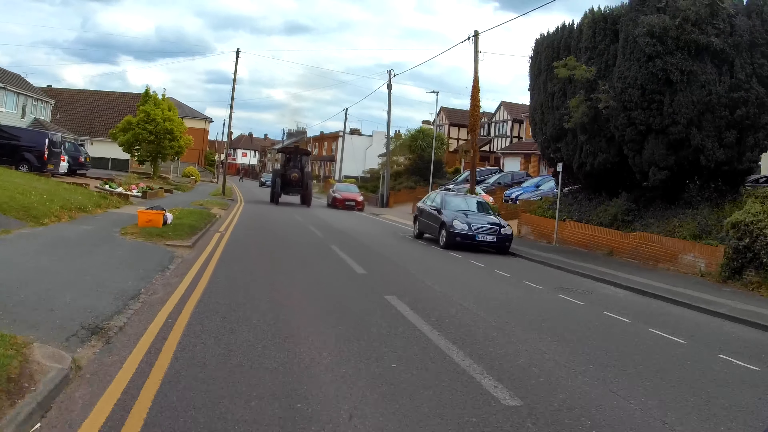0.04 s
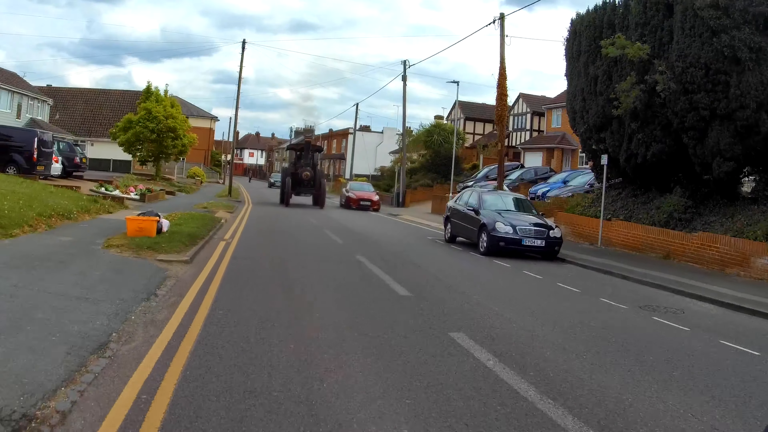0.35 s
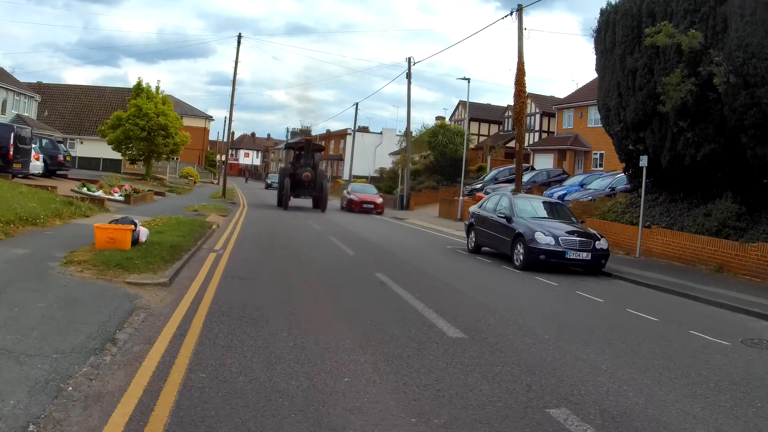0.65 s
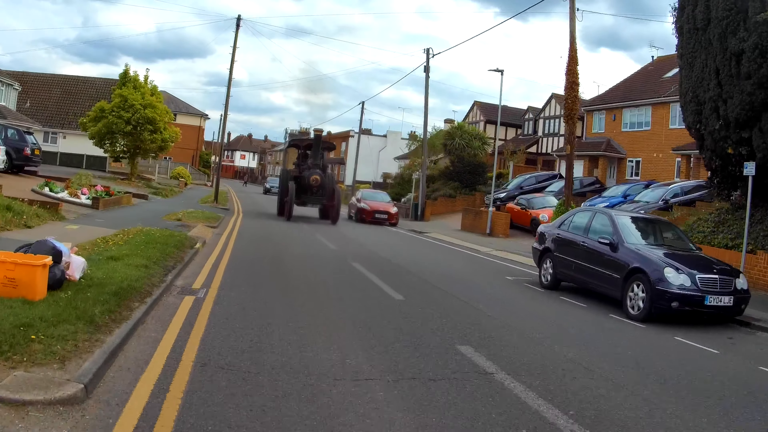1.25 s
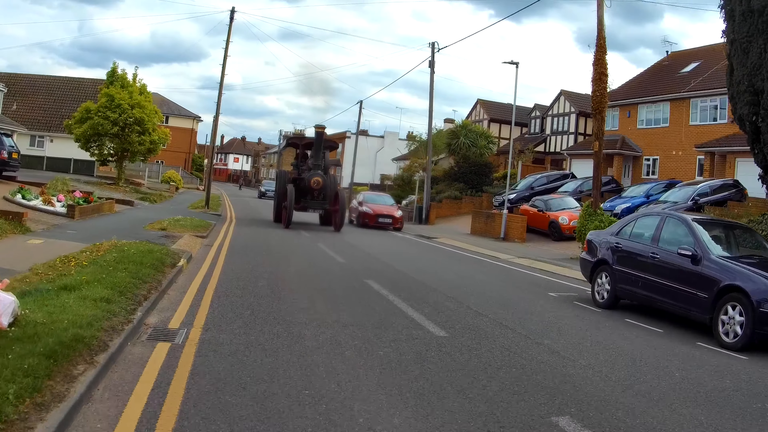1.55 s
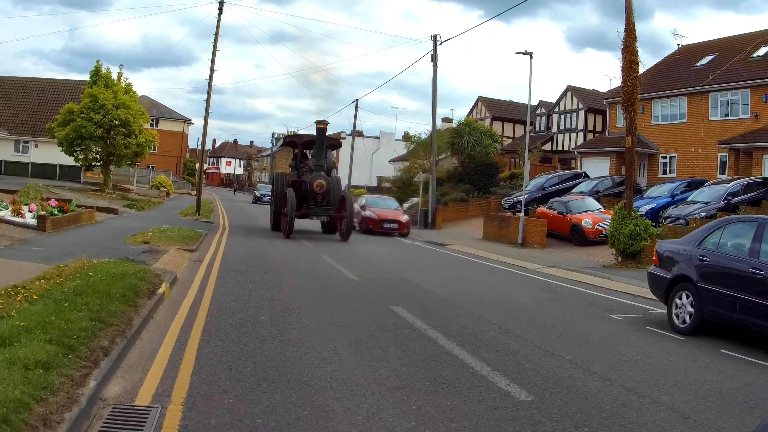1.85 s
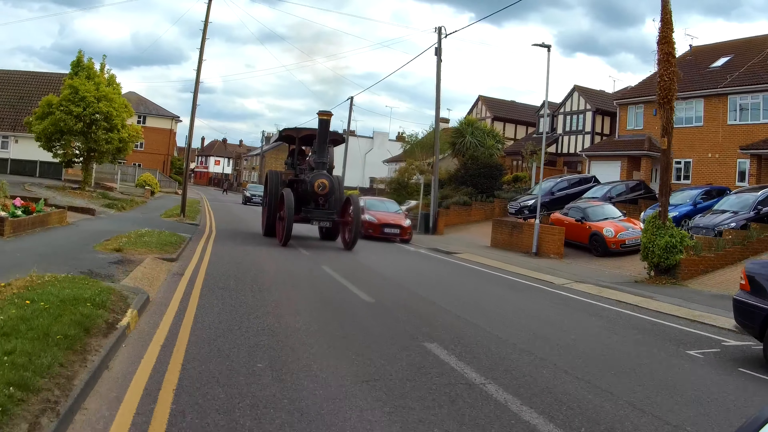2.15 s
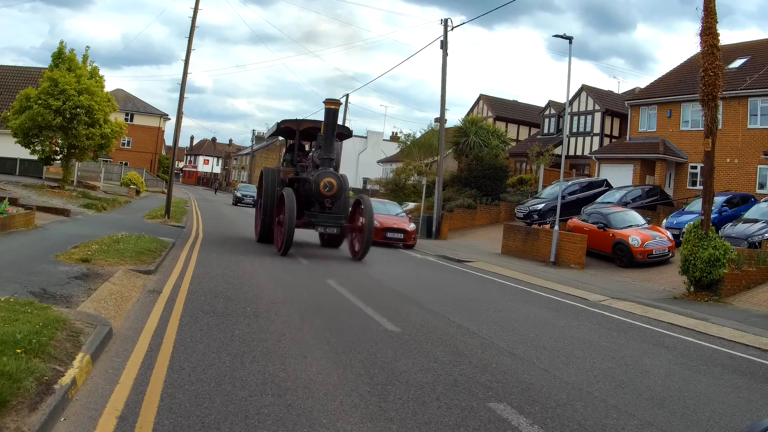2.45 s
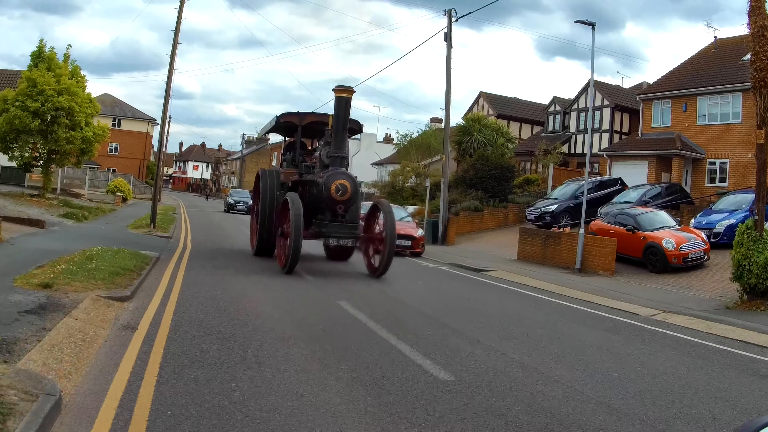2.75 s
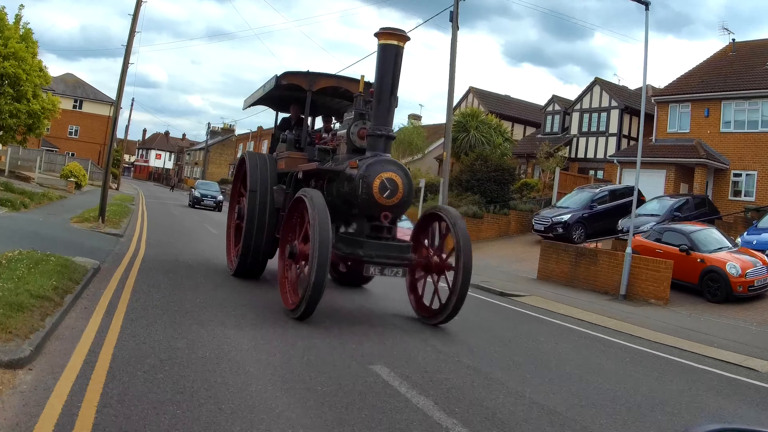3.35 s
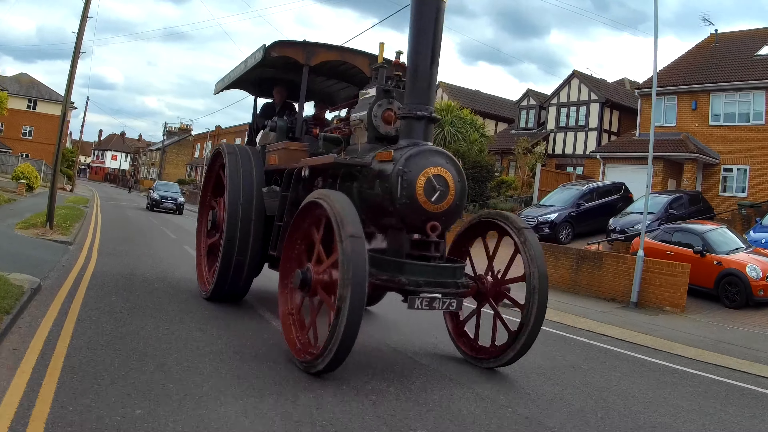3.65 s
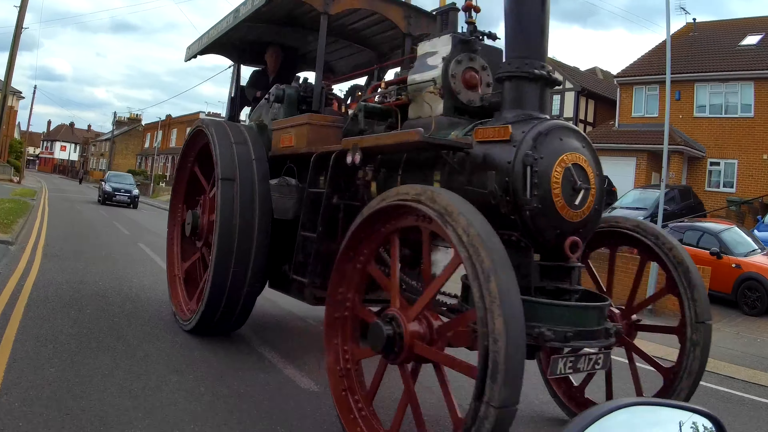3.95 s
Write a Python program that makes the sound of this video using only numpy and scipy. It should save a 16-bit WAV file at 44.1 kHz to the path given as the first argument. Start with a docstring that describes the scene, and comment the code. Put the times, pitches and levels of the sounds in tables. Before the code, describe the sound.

An approaching steam traction engine chuffs and clanks, growing louder over throbbing tyre noise.

```python
"""A steam traction engine comes up a street, growing louder and chuffing about 3.5 times a second.
Each chuff is a turbulent jet of steam that excites resonances in the chimney and pipes. Impacts and
friction make its ironwork clatter, ring and squeak, grit cracks under its tyres, and house fronts echo.
It is heard from a camera on a small moving vehicle, whose ride adds tyre noise, a quick wheel throb,
a few bumps in the road and the rumble of a shaking mount."""
import sys
import numpy as np
from scipy import signal
from scipy.fft import rfft, irfft
from scipy.io import wavfile
from scipy.ndimage import uniform_filter1d, minimum_filter1d

SR = 44100
rng = np.random.default_rng(int(sys.argv[2]) if len(sys.argv) > 2 else 0)


def waveform_to_disk(signal):
    """Save audio, clipped to [-1, 1], as 16-bit WAV at the path in sys.argv[1]."""
    frames = np.transpose(np.atleast_2d(signal))
    scaled = np.clip(frames, -1, 1) * 32767
    samples = np.round(scaled).astype(np.int16)
    wavfile.write(sys.argv[1], SR, samples)


N = 176400
T = np.arange(N) / SR


def amp(db):
    """Logarithmic level: 20 dB is a factor of ten in amplitude."""
    return 10 ** (np.asarray(db) / 20)


def unit(x):
    """Normalisation to rms 1."""
    return x / np.sqrt(np.mean(x ** 2) + 1e-20)


def curve(points):
    """Linear interpolation between (time [s], value) points."""
    return np.interp(T, *np.transpose(points))


def shaped(x, points):
    """Spectral filtering by a curve of (frequency [Hz], gain [dB])."""
    hz, db = np.transpose(points)
    log_hz = np.log(np.fft.rfftfreq(2 * N, 1 / SR) + 1)
    gain = amp(np.interp(log_hz, np.log(hz + 1), db))
    return irfft(rfft(x, 2 * N) * gain)[:N]


def colour(x, points):
    """Spectral shaping at rms 1."""
    return unit(shaped(x, points))


def ring(hz, half_width_hz):
    """Resonance under random forcing, at rms 1; centred on 0 Hz it is a random fluctuation."""
    f = np.fft.rfftfreq(N, 1 / SR)
    return unit(irfft(rfft(rng.standard_normal(N)) / (1 + ((f - hz) / half_width_hz) ** 2), N))


def steadied(x, size):
    """Division by the running rms evens out the swells of a noise."""
    return x / np.sqrt(uniform_filter1d(uniform_filter1d(x ** 2, size), size) + 1e-9)


def sine(hz):
    """Frequency modulation: phase is the integral of frequency."""
    return np.sin(2 * np.pi * np.cumsum(hz) / SR)


def impulses(per_s):
    """A Poisson process: independent events at a mean rate."""
    return rng.random(N) < per_s / SR


# exhaust beats (time [s], duration [s], level [dB], chimney bark relative to the beat [dB])
EXHAUST_BEATS = [(-.02, 0.21, -41.5, -5), (0.3, 0.14, -37.5, -6), (0.578, 0.077, -33, -15),
                 (0.84, 0.23, -43, 0), (1.09, 0.15, -39, -10), (1.429, 0.061, -36.5, 0),
                 (1.705, .18, -35, -1.5), (1.995, 0.077, -35, 0), (2.232, 0.15, -32, -3.5),
                 (2.618, 0.14, -34, 2), (2.845, 0.099, -32.5, 0), (3.127, 0.12, -29.5, -1),
                 (3.408, 0.12, -28, -23), (3.586, 0.11, -28.5, -1), (3.678, 0.19, -30, -3),
                 (3.864, 0.072, -25, -13)]
# spectra of the steam jet and the chimney's hollow bark (frequency [Hz], relative level [dB])
STEAM_SPECTRUM = [(60, -18), (150, 5.5), (400, 0.5), (800, 2.5), (1400, 0.5), (2000, 0), (3000, -11),
                  (3900, -14.5), (4400, -18.5), (6000, -28.5), (6600, -30), (7200, -30), (9000, -41.5),
                  (15000, -63)]
BARK_SPECTRUM = [(300, -32), (600, -10), (800, -1), (1100, 0.5), (1450, -7), (2500, -27), (8000, -72)]
# steam pipe resonances (frequency [Hz], half-width [Hz], level relative to the jet [dB])
PIPE_MODES = [(4660, 58, -31.5), (5450, 47, -32), (6170, 85, -29.5), (7160, 57, -34)]


def exhaust(rise_s=0.014, fall_s=0.025):
    """Jet noise: each puff of steam rises, holds and decays, exciting the chimney and pipes."""
    jet_level, bark_level = np.zeros(N), np.zeros(N)
    for start, length, db, bark_db in EXHAUST_BEATS:
        rise = np.clip((T - start) / rise_s, 0, 1)
        decay = np.exp(-np.maximum(T - start - length + fall_s, 0) / fall_s)
        puff = amp(db) * rise * decay
        jet_level += puff
        bark_level += amp(bark_db) * puff
    spits = unit(rng.choice([-1, 1], N) * impulses(per_s=780))
    flutter = amp(2.8 * ring(0, half_width_hz=25))
    steam = colour(rng.standard_normal(N) + amp(-4) * spits, STEAM_SPECTRUM)
    pipes = sum(amp(db) * ring(hz, width) for hz, width, db in PIPE_MODES)
    bark = colour(rng.standard_normal(N), BARK_SPECTRUM)
    return jet_level * flutter * (steam + pipes) + bark_level * bark


# growth of clatter, jangle and grit as the engine nears (time [s], level [dB])
APPROACH_LEVEL = [(0, -47.5), (1, -41.5), (2, -38), (2.6, -33.5), (3.1, -32), (3.4, -28.5), (3.55, -27),
                  (3.75, -25), (4, -23.5)]
# spectrum of the running gear (frequency [Hz], relative level [dB])
CLATTER_SPECTRUM = [(60, -15), (110, 12), (200, 3), (400, 3.5), (520, -3.5), (1000, -1), (1500, -2.5),
                    (2000, -9.5), (3000, -19), (3900, -19), (4400, -25.5), (7300, -40.5), (9000, -55),
                    (15000, -62)]


def running_gear(spread_db=4.5, knock_share=0.13):
    """Impact and friction noise: many small iron knocks add in power to the grinding of the wheels."""
    knocks = impulses(per_s=320) * rng.choice([-1, 1], N)
    force = amp(spread_db * np.minimum(rng.exponential(1, N), 4))
    grinding = rng.standard_normal(N)
    drive = np.sqrt(knock_share) * unit(knocks * force) + np.sqrt(1 - knock_share) * grinding
    return amp(curve(APPROACH_LEVEL)) * colour(drive, CLATTER_SPECTRUM)


# gear wheel resonances (frequency [Hz], half-width [Hz], relative level [dB])
GEAR_MODES = [(786, 31, -50), (1900, 27, -46.5), (2320, 37, -53), (2432, 34, -53), (3524, 19, -65),
              (5600, 76, -67.5), (7240, 44, -79)]
# growth of the ringing and whine (time [s], gain [dB])
GEAR_GAIN = [(0, -3.5), (.5, -4), (1.2, -2.5), (2.2, 2.5), (3.2, 4.5), (3.65, 4.5), (4, 6.5)]
# swells of the whine (peak time [s], duration [s], level [dB])
SQUEALS = [(0.449, 0.038, -37), (0.734, 0.23, -40.5), (1.132, .06, -38), (1.256, 0.04, -38),
           (1.364, 0.035, -34), (1.57, 0.24, -44.5), (2.545, 0.018, -27), (2.664, 0.11, -43),
           (2.892, 0.034, -29), (3.083, 0.018, -27), (3.395, 0.085, -34), (3.618, 0.17, -32),
           (3.694, 0.014, -24), (3.896, 0.033, -18)]


def gear_ring(whine_hz=1894, wander_hz=8.96, roughness=0.6):
    """Forced vibration: rubbing keeps the gears ringing; their wavering whine swells into squeals."""
    gain = amp(curve(GEAR_GAIN))
    modes = sum(amp(db) * steadied(ring(hz, width), size=6000) for hz, width, db in GEAR_MODES)
    squeals = sum(amp(db) / (1 + (2 * (T - peak) / length) ** 4) for peak, length, db in SQUEALS)
    pitch = whine_hz + wander_hz * ring(0, 9.76)
    whine = np.sqrt(2) * sine(pitch) + roughness * ring(whine_hz, 45)
    return gain * modes + (amp(-41) * gain + squeals) * whine


# modes of loose iron plates and rods (frequency [Hz], relative level [dB], 60 dB decay time [s])
PLATE_MODES = [(292.4, -4.5, 0.093), (407, -5, 0.22), (804.4, -5, 0.36), (908, -3.5, 0.081),
               (1003, -3, 0.15), (1185, -9, 0.1), (1385, -4.5, 0.028), (1708, -12, 0.12)]


def jangle(attack_s=0.002):
    """Free vibration: each loose part, struck at random, rings down at its natural frequency."""
    t, out = T[:SR // 3], np.zeros(N)
    for hz, db, t60 in PLATE_MODES:
        knocks = impulses(per_s=14) * rng.uniform(0.57, 1, N)
        tone = (1 - np.exp(-t / attack_s)) * amp(-60 * t / t60) * np.sin(2 * np.pi * hz * t)
        out += amp(db) * unit(signal.oaconvolve(knocks, tone)[:N])
    return amp(curve(APPROACH_LEVEL) - 7.5) * out


# ironwork impacts (time [s], frequency [Hz], half-width [Hz], level [dB], 60 dB decay time [s])
IRON_IMPACTS = [(1.105, 2580, 190, -24.5, 0.082), (1.435, 3660, 110, -41.5, 0.16),
                (3.168, 2330, 260, -28, .11), (3.508, 2330, 39.7, -29.5, .15),
                (3.89, 2680, 900, -29.5, .13)]


def clanks(rise_s=0.005):
    """Damped resonance: loose iron parts knock and ring briefly in a band of noise."""
    out = np.zeros(N)
    for start, hz, width, db, t60 in IRON_IMPACTS:
        t = np.maximum(T - start, 0)
        envelope = np.minimum(t / rise_s, 1) * amp(db - 60 * t / t60)
        out += envelope * steadied(ring(hz, width), size=500)
    return out


# joint squeaks (time [s], duration [s], first frequency [Hz], last frequency [Hz], level [dB])
JOINT_SQUEAKS = [(0.319, 0.041, 2383, 2490, -36), (0.599, 0.044, 2340, 2530, -37.5),
                 (1.735, 0.076, 2320, 2436, -33.5), (2.306, 0.026, 2320, 2330, -33.5),
                 (3.168, .036, 2280, 2485, -27.5)]


def squeaks(waver_hz=21.3, roughness=0.35):
    """Friction tones: dry joints give short, slightly rough upward glides."""
    out, waver = np.zeros(N), waver_hz * ring(0, 66)
    for start, length, first_hz, last_hz, db in JOINT_SQUEAKS:
        progress = np.clip((T - start) / length, 0, 1)
        pitch = first_hz + (last_hz - first_hz) * progress + waver
        out += amp(db) * np.sqrt(2 * abs(np.sin(np.pi * progress))) * sine(pitch)
    return out * (1 + roughness * ring(0, 92))


# larger stones being crushed (peak time [s], half-duration [s], level [dB])
CRUSHED_STONES = [(1.125, 0.017, -55), (2.707, .016, -51), (2.89, .018, -51), (3.178, .015, -48),
                  (3.283, .015, -49), (3.605, 0.0045, -39), (3.901, .016, -53)]
# spectra of cracking grit and stones (frequency [Hz], relative level [dB])
GRIT_SPECTRUM = [(1000, -27), (3000, -5), (7500, 3), (9000, -17), (15000, -22)]
STONE_SPECTRUM = [(1500, -23), (3000, -6), (4400, 0), (7300, -3), (9000, -17), (15000, -35)]


def grit(t60_s=0.023):
    """Brittle fracture: grit and a few stones crack under the iron tyres in bursts of noise."""
    cracks = impulses(per_s=120) * rng.uniform(0.58, 1, N)
    power_decay = amp(-120 * T[:SR // 10] / t60_s)
    envelope = np.sqrt(abs(signal.oaconvolve(cracks, power_decay)[:N]))
    ticks = colour(envelope * rng.standard_normal(N), GRIT_SPECTRUM)
    stones = sum(amp(db) * np.exp(-((T - peak) / width) ** 2) for peak, width, db in CRUSHED_STONES)
    crunch = colour(rng.standard_normal(N), STONE_SPECTRUM)
    return amp(curve(APPROACH_LEVEL) - 28) * ticks + stones * crunch


# deep hum (time [s], frequency [Hz], level [dB])
HUM_TRACK = [(2.3, 31.07, -26), (2.45, 32.26, -22.5), (2.62, 32.3, -16.5), (2.77, 33, -26),
             (2.9, 33.13, -14.5), (3.03, 31.7, -19.5), (3.3, 32.46, -16), (3.5, 32.45, -12),
             (3.65, 32.83, -14), (3.74, 32.28, -11), (3.8, 32.6, -15), (4, 32.8, -7)]


def hum(fade_in_s=0.31):
    """A modulated low tone: a deep hum builds unevenly as the engine comes close."""
    times, hz, db = np.transpose(HUM_TRACK)
    fade_in = np.clip((T - times[0]) / fade_in_s + 1, 0, 1)
    return amp(np.interp(T, times, db)) * fade_in * np.sqrt(2) * sine(np.interp(T, times, hz))


# spectra of the ride's wheel throb and road noise (frequency [Hz], relative level [dB])
THROB_SPECTRUM = [(60, -36), (95, 2), (130, 3), (175, -8.5), (205, -2.5), (240, -11.5), (285, -6),
                  (340, -14.5), (480, -46), (1000, -68), (4000, -110)]
ROAD_SPECTRUM = [(60, -4.5), (200, 4.5), (500, 3), (1000, -3.5), (1500, -4.5), (2300, -8.5), (3000, -18.5),
                 (3850, -20), (4400, -24.5), (7000, -33.5), (9000, -43), (15000, -60)]


def tyres(throb_hz=12.25, first_s=0.0615, knock_hz=125.3, spread_hz=8.8):
    """Periodic forcing: the wheels of the camera's vehicle knock and throb over steady rolling noise."""
    cycles = (T - first_s) * throb_hz
    beat = np.round(cycles).astype(int)
    t = (cycles - beat) / throb_hz  # time from the nearest beat [s]
    force, detune = rng.uniform(-0.92, 1, (beat.max() + 2, 2))[beat].T
    strength = amp(2.5 * force)
    pitch = knock_hz + spread_hz * detune
    knock = strength * np.exp(-(t / 0.0098) ** 2) * np.cos(2 * np.pi * pitch * t)
    pulse = 0.74 + strength * np.exp(-(t / 0.013) ** 2)
    throb = pulse * steadied(colour(rng.standard_normal(N), THROB_SPECTRUM), size=900)
    road = colour(rng.standard_normal(N), ROAD_SPECTRUM)
    return amp(-20) * knock + amp(-29) * throb + amp(-34) * road


# dents in the road (time [s], level [dB])
ROAD_DENTS = [(0.133, -18.5), (0.243, 1), (0.397, -9.5), (.71, -9)]
# modes of the vehicle's frame (frequency [Hz], relative level [dB], 60 dB decay time [s])
FRAME_MODES = [(22.27, -10, 2.7), (57.6, 2.5, 0.18), (119.5, 1.5, 0.088), (249, -2.5, 0.044),
               (350, -8, 0.061), (670, -6, 0.019), (980, -12, 0.027)]


def bumps(attack_s=0.0045):
    """Impulse response: at each dent the frame of the camera's vehicle thuds and sways in its modes."""
    out = np.zeros(N)
    for start, level_db in ROAD_DENTS:
        t = np.maximum(T - start, 0)
        modes = sum(amp(db - 60 * t / t60) * np.sin(2 * np.pi * hz * t) for hz, db, t60 in FRAME_MODES)
        out -= amp(level_db) * (1 - np.exp(-(t / attack_s) ** 2)) * modes
    return out


# spectrum of the mount's vibration (frequency [Hz], relative level [dB])
MOUNT_SPECTRUM = [(5, -26), (18, -7.5), (27, 5.5), (34, 2.5), (45, -13), (59, 3), (72, -18), (95, -12),
                  (140, -29), (400, -82)]
# strength of the shaking (time [s], level [dB])
MOUNT_LEVEL = [(0, -17.5), (.2, -14.5), (.42, -9), (.6, -15), (.9, -21), (1.3, -17), (1.8, -23), (2.2, -16),
               (2.9, -18), (3.4, -20.5), (4, -13.5)]


def mount_shake():
    """Structure-borne sound: the shaking mount passes a low rumble to the camera."""
    return amp(curve(MOUNT_LEVEL)) * steadied(colour(rng.standard_normal(N), MOUNT_SPECTRUM), size=5000)


def street(x, tail_db=-9, t60_s=0.55):
    """Reverberation: the house fronts return a short diffuse tail."""
    t = T[:SR // 2]
    echoes = rng.standard_normal(len(t)) * (rng.random(len(t)) < 0.05)
    echoes *= amp(-60 * t / t60_s) * (t > 0.01)
    return x + amp(tail_db) * signal.fftconvolve(x, echoes / np.linalg.norm(echoes))[:N]


def scene():
    """Superposition: the engine, its echoes and the camera's ride add in one channel."""
    engine = street(exhaust() + running_gear() + jangle() + grit() + clanks() + squeaks())
    return (engine + gear_ring() + hum() + tyres() + mount_shake() + bumps())[None]


# resonances of the camera's case (frequency [Hz], gain [dB])
CASE_RESPONSE = [(230, -0.5), (280, 2), (345, -4.5), (400, -0.5), (490, -3.5), (560, 0), (640, -4),
                 (790, 2), (1000, -2), (1200, -2), (1400, -2), (1750, -5), (2080, -5), (2330, 4),
                 (2480, -1), (2600, 0.5), (2860, -6.5), (3000, 1), (3280, -4.5), (3500, 5.5), (3900, 3.5),
                 (4200, -7), (4600, -3)]


def record(dry, hiss_db=-59, limit_db=-1, recovery_db_per_s=80, cutoff_hz=15300):
    """Case resonance colours the sound; hiss is added, a limiter ducks peaks, a low-pass ends the band."""
    x = shaped(dry[0], CASE_RESPONSE) + amp(hiss_db) * rng.standard_normal(N)
    recovery = T * recovery_db_per_s
    peak_db = np.maximum.accumulate(20 * np.log10(abs(x) + 1e-6) + recovery) - recovery
    gain_db = minimum_filter1d(-np.maximum(peak_db - limit_db, 0), size=300)
    gain = amp(uniform_filter1d(uniform_filter1d(gain_db, size=200), size=200))
    low_pass = signal.firwin(511, cutoff_hz, window=("kaiser", 9), fs=SR)
    return signal.oaconvolve(x * gain, low_pass, "same")[None]


dry = scene()
out = record(dry)
waveform_to_disk(out)
```